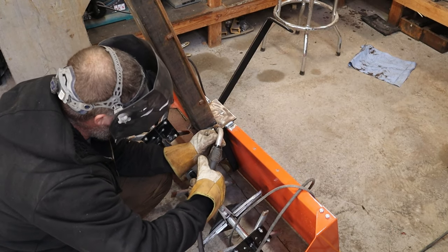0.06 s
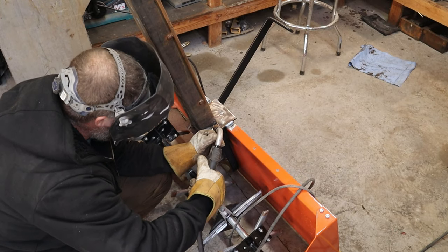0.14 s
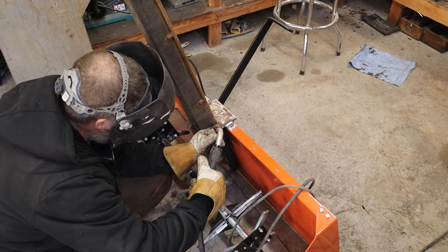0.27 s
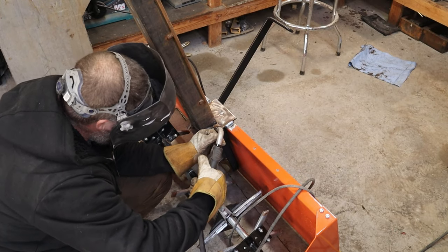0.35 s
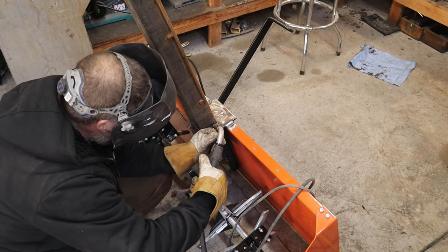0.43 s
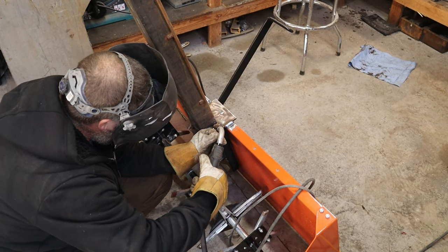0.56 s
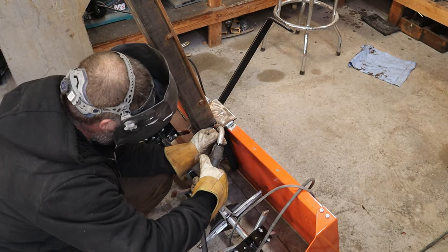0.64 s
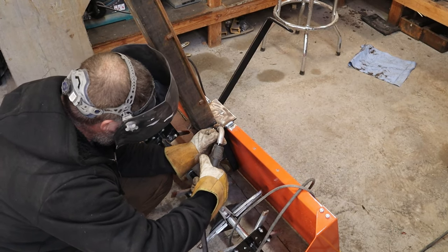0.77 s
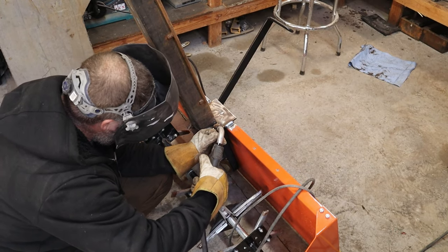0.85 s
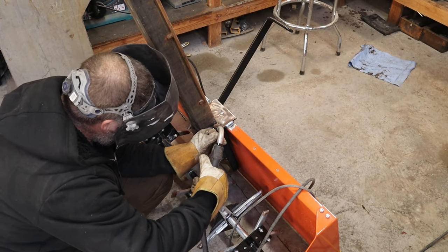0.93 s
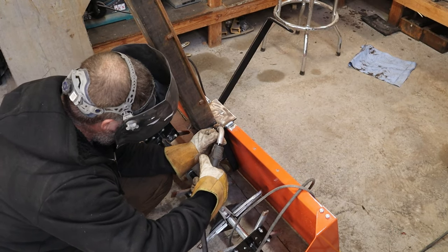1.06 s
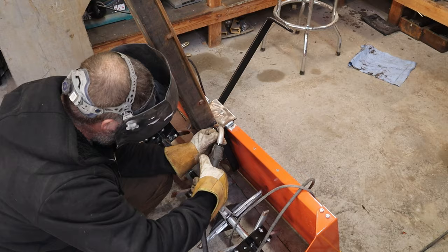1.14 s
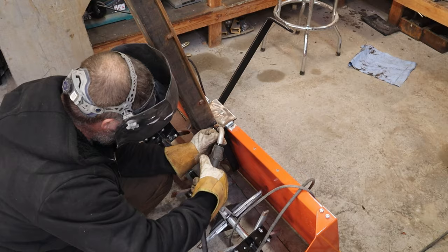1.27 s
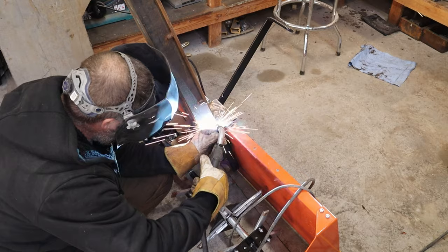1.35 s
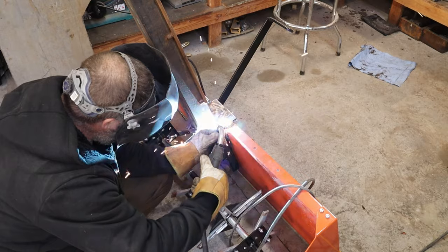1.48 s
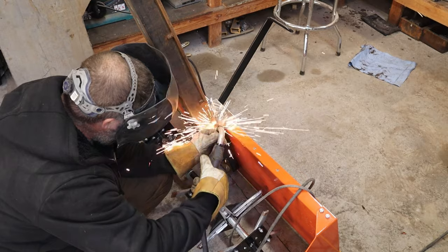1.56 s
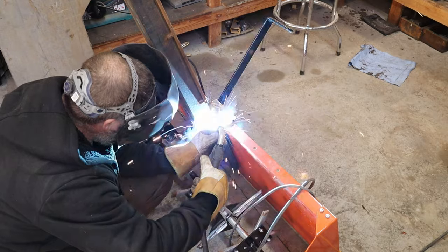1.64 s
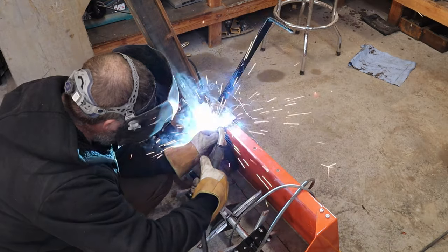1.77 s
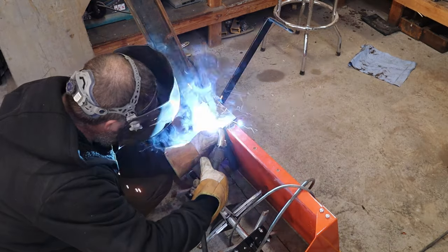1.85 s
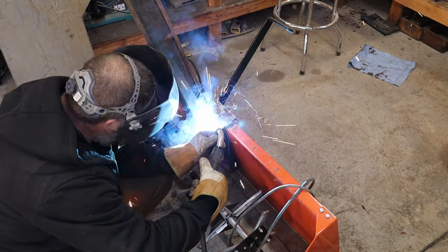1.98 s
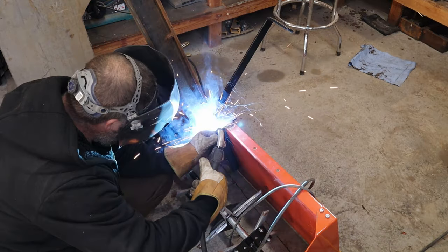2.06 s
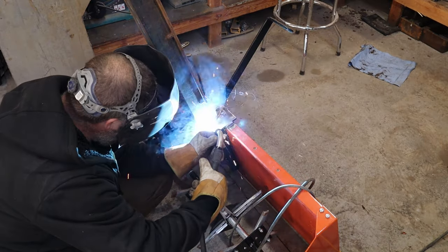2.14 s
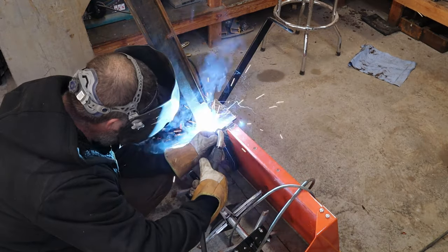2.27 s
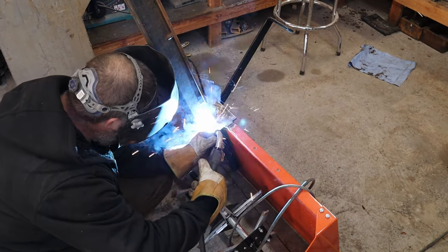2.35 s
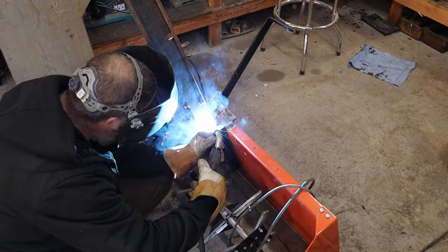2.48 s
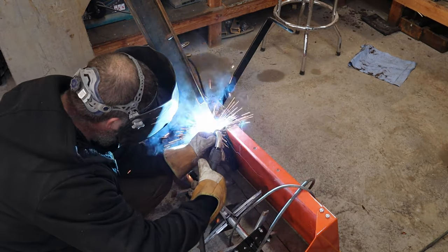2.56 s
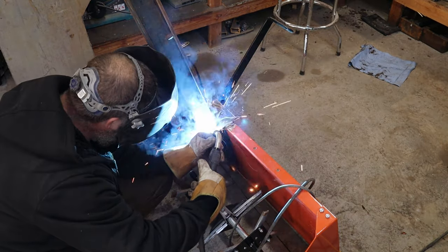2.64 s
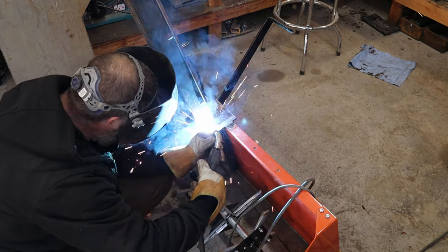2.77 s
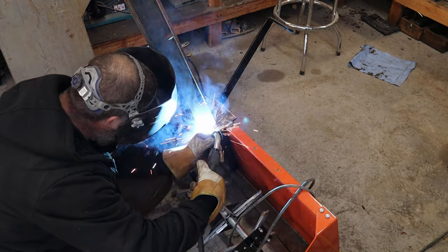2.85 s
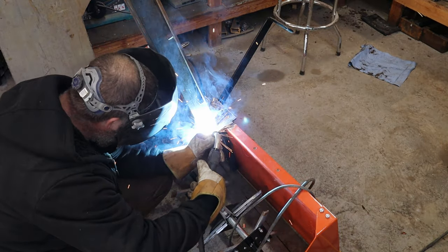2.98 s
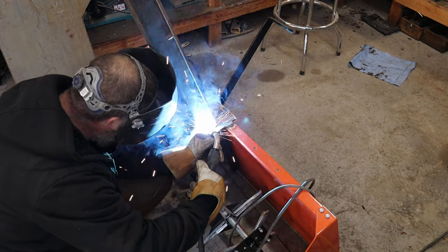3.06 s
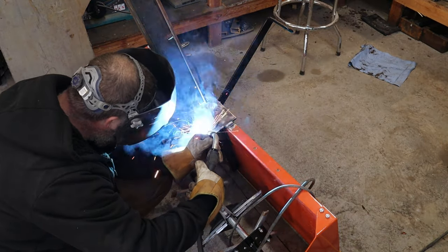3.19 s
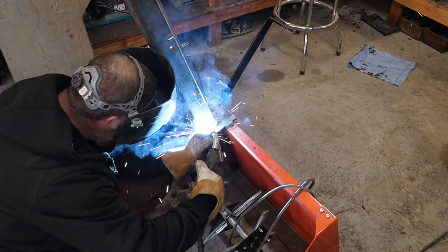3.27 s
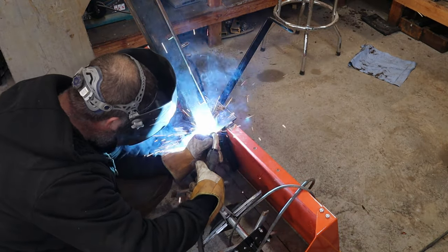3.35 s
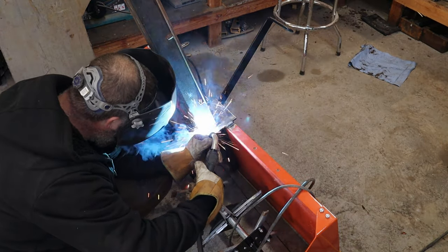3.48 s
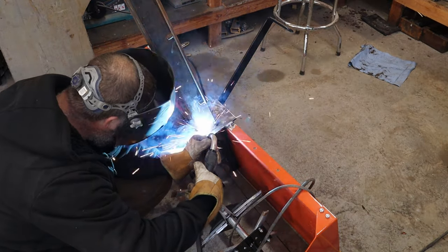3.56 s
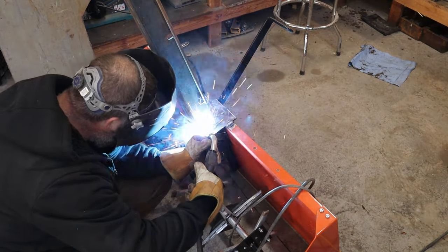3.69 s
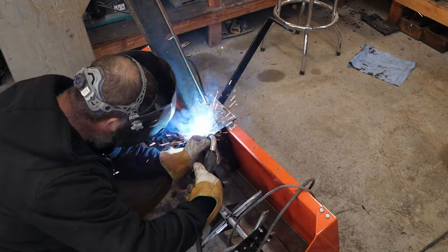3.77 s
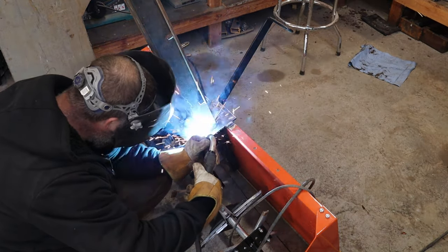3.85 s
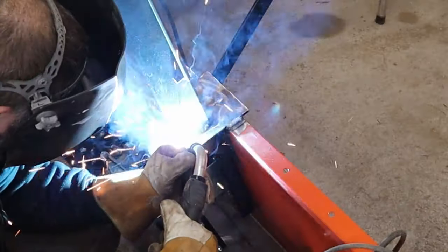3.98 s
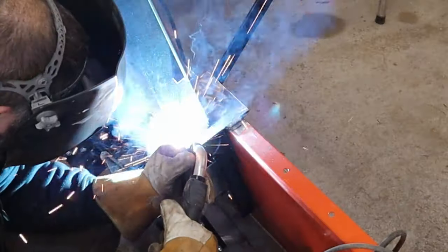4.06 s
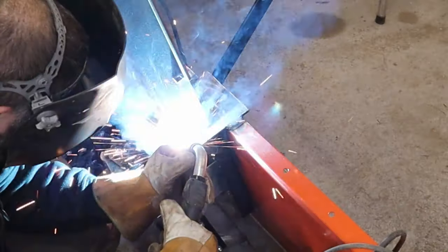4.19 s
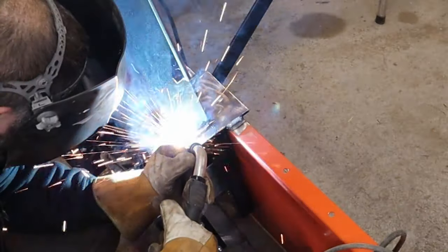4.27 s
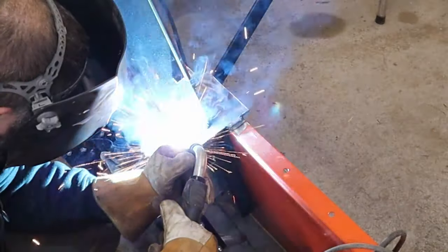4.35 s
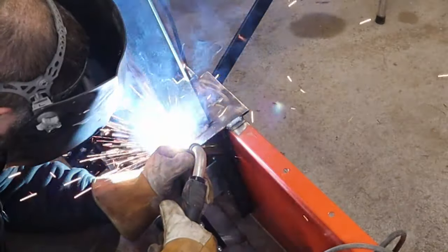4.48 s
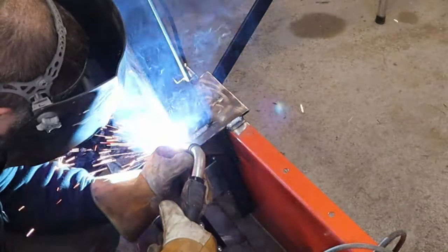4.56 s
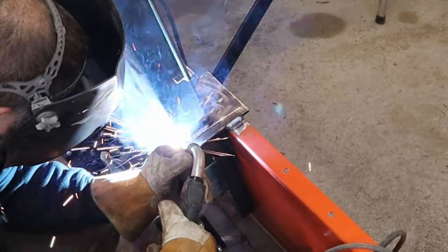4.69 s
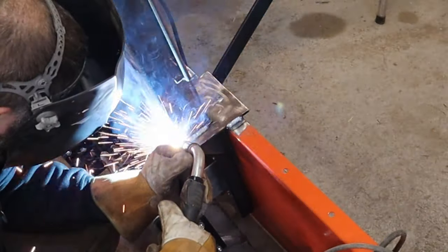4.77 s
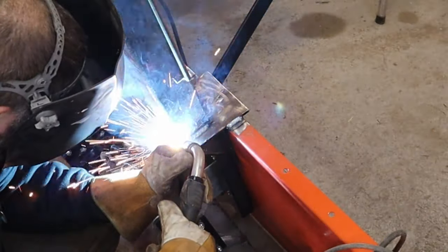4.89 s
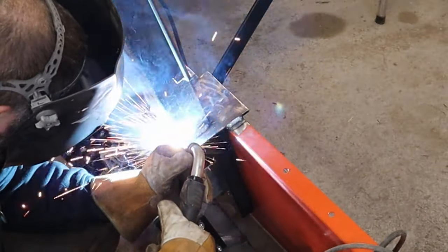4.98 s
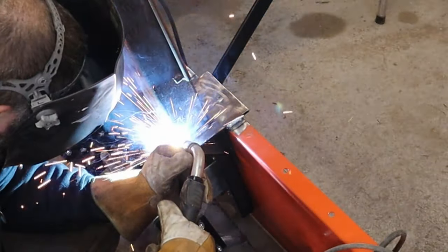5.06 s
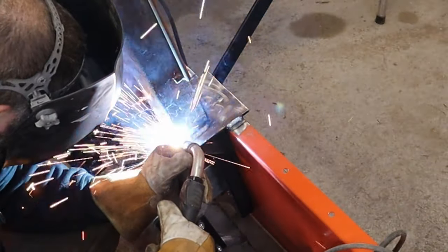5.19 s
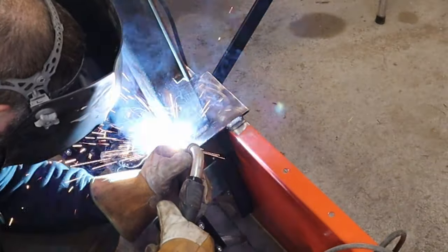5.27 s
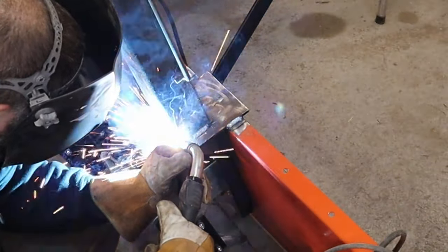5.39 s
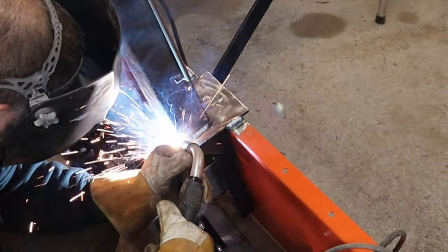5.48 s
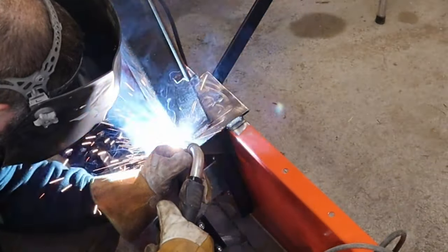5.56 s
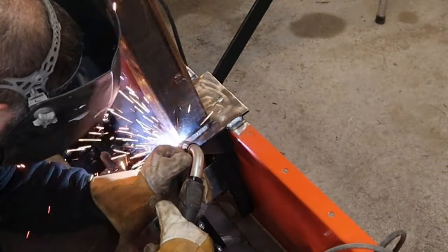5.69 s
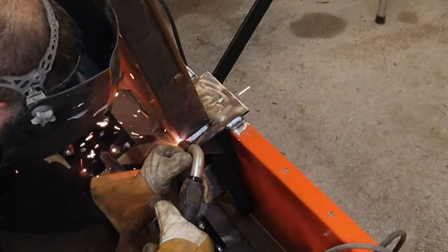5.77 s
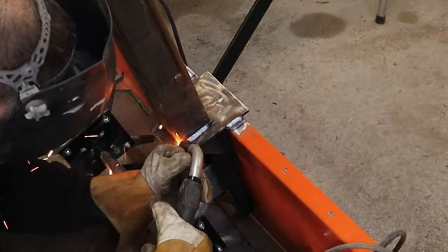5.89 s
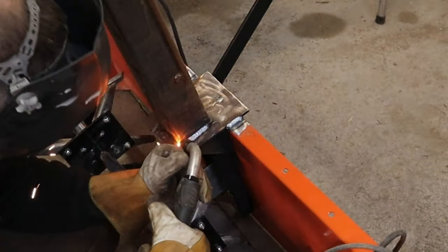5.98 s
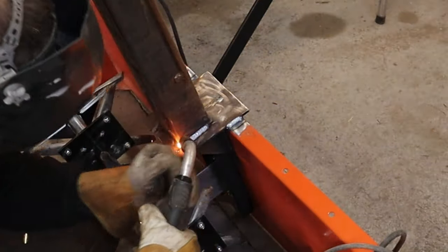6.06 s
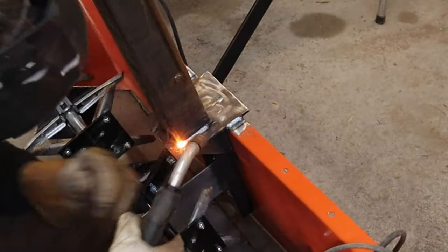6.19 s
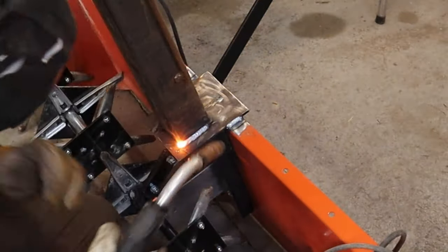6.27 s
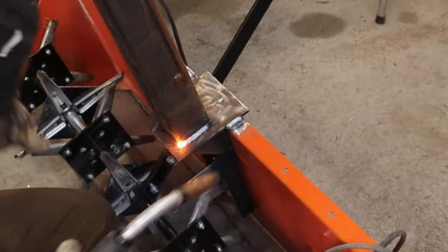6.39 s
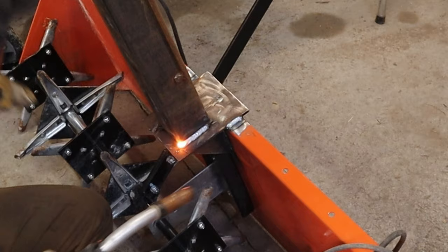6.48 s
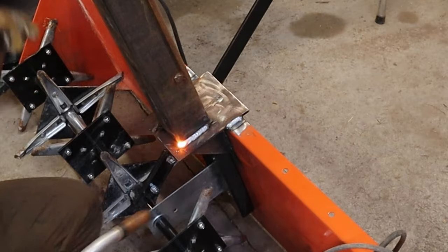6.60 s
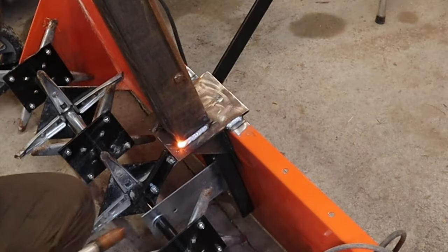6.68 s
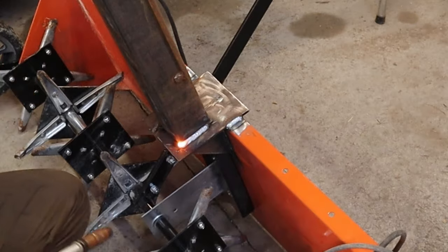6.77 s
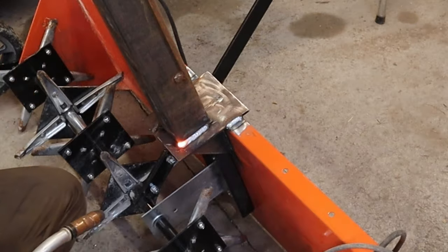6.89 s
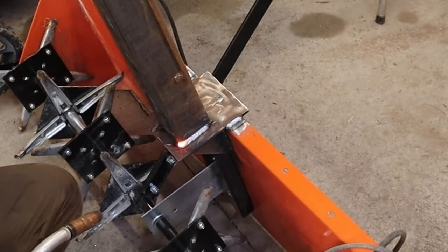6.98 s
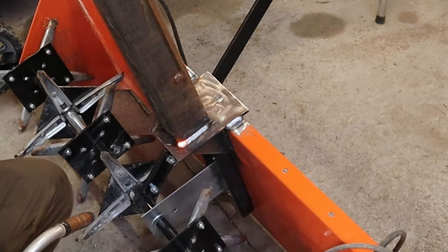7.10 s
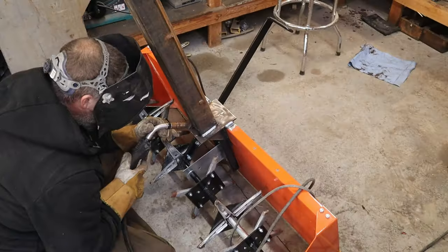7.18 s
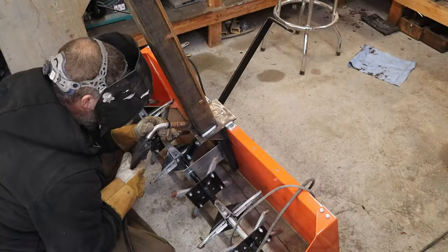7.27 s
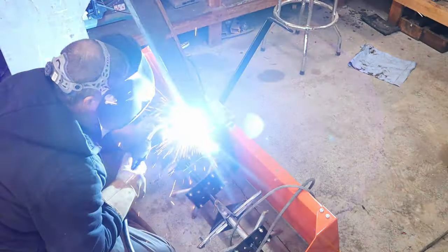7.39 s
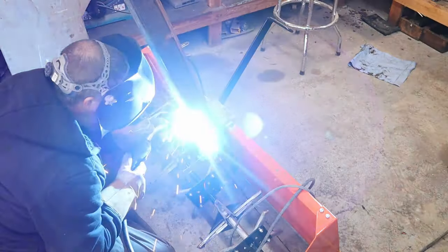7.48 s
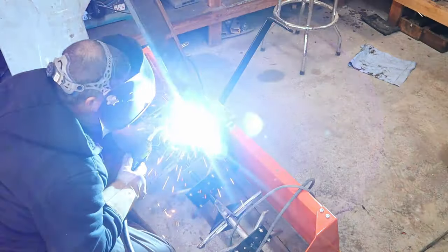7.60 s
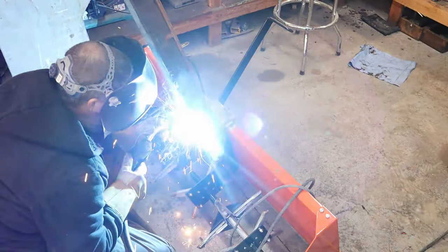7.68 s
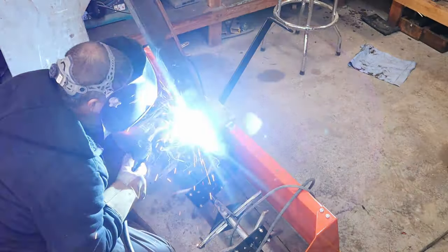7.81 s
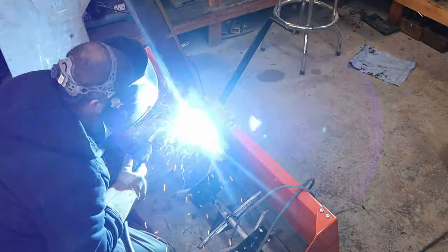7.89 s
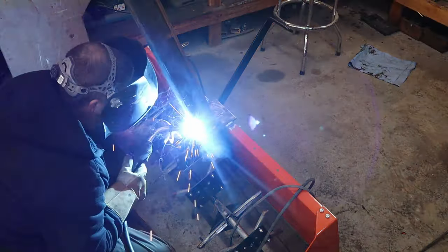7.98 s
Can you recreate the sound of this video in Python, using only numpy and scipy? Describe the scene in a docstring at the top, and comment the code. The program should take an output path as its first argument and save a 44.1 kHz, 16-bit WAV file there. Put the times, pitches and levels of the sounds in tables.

```python
"""Wire-feed welding in a workshop

A wire-feed welder lays a bead on a steel frame. The gas valve clacks and gas hisses: noise through nozzle modes.
The arc stutters alight, blurs into a wide swirling hiss, then crackles close and sharp: unevenly timed pops.
The gas runs on, cloth rubs and something knocks with short modes; then a second run starts.
Echoes and a diffuse tail place arc and knocks in the shop, over a low drone and faint hiss."""
import sys
import numpy as np
from scipy import signal
from scipy.fft import rfft, irfft, next_fast_len
from scipy.io import wavfile
from scipy.ndimage import uniform_filter1d, map_coordinates

SR = 44100
rng = np.random.default_rng(int(sys.argv[2]) if len(sys.argv) > 2 else 0)


def pcm_store(signal):
    """Save signal as 16-bit PCM."""
    levels = np.round(np.clip(np.atleast_2d(signal), -1, 1) * 32767)
    wavfile.write(sys.argv[1], SR, levels.astype(np.int16).T)


N = 354563

# loud pops as the stuck wire blows free: t/s, relative level/dB, time stuck beforehand/s
LOUD_POPS = [(1.4075, -10, .01), (1.4228, -5.5, .01), (1.4393, -2, .004), (1.4434, -12, 0.0018),
             (1.4853, -14, 0.0055), (1.5886, -7, 0.007), (1.5929, -8, .003), (1.606, -8.5, .003),
             (1.6259, -7, 0.016), (1.6298, -6, 0.0039), (4.0238, -10.5, .014), (4.114, -9.5, 0.031),
             (4.2586, -12.5, 0.026), (4.301, -9.5, 0.013), (4.3245, -12, .01), (4.4133, -12, 0.016),
             (4.556, -13.5, 0.0072), (4.638, -5, 0.018), (4.6684, -12, .01), (4.6993, -5, 0.013),
             (4.706, -16, .004), (4.812, -11, 0.011), (4.8789, -7, 0.0083), (5.01, -9.5, 0.009),
             (5.125, -13.5, 0.0061), (5.378, -13, 0.0075), (5.5005, -13.5, 0.026), (5.624, -9.5, .01),
             (5.7749, -13.5, .01), (5.8027, -17.5, .01), (5.8615, -16.5, .01), (5.8828, -16.5, .01),
             (5.8987, -15, .01), (7.3834, -12.5, 0.0063), (7.4113, -9, 0.0066), (7.427, -11, 0.0045),
             (7.4448, -7, 0.0072), (7.4615, -8.5, 0.0036), (7.576, -14, 0.018), (7.5924, -12.5, 0.0082),
             (7.6868, -12, 0.0057), (7.7923, -6.5, 0.0087), (7.9812, -19, 0.016)]
# stretches in which the arc burns and crackles: start/s, end/s, level at the start/dB
BURNS = [(1.426, 1.501, -21.5), (1.59, 1.63, -20), (3.967, 4.612, -26.5), (4.66, 5.756, -30.5),
         (7.368, 7.535, -25), (7.574, 8.1, -30.5)]
# colour of the arc's pops and crackle: f/Hz, relative level/dB
POP_COLOUR = [(50, -38), (130, -17), (290, -24), (450, -15.5), (680, -17.5), (930, -6), (1350, -4.5),
              (1600, -12.5), (3050, -3.5), (3450, 2.5), (4300, 2), (4750, -8), (5200, -5.5), (7500, -9.5),
              (10500, -20), (12500, -17.5), (16000, -19)]
# change of colour where the torch faces the listener: f/Hz, gain/dB
FACING_COLOUR = [(150, 2.5), (300, 4), (550, 2.5), (1300, -3), (2000, 2.5), (4200, -0.5), (6000, 1.5),
                 (9000, 4), (15000, 1.5)]
# low flutter under the arc: f/Hz, width/Hz, relative level/dB
FLUTTER_MODES = [(111, 13, -5), (150, 32, -12.5)]
# each burn catches quickly, swells gently and dies quickly
CATCH_S, SWELL_DB_PER_S, QUENCH_S = 0.0019, 2.6, 0.005
# the hot pool sputters on after the arc: level against the burn, and cooling time
POOL_DB, COOLING_S = -14, 0.14
STUCK_DB = -7.5  # the crackle sinks while the wire is stuck

# the crackle blurred into a hiss: t/s, hiss level/dB, body level/dB
BLUR_LEVELS = [(1.673, -27.5, -38.5), (2.0, -26.5, -38), (2.3, -30, -45.5), (2.8, -28.5, -43),
               (3.2, -32.5, -47), (3.65, -31, -41), (3.96, -29.5, -38.5)]
# colour of the blurred hiss: f/Hz, relative level/dB
BLUR_HISS_COLOUR = [(900, -37), (1550, -25), (1780, -1.5), (2050, -8), (2600, -1.5), (3100, 0.5), (4000, 6),
                    (4700, -4), (5200, 1.5), (6600, -6), (8500, -7), (10500, -17), (12500, -11),
                    (15500, -14.5)]
# colour of its lower body: f/Hz, relative level/dB
BLUR_BODY_COLOUR = [(40, -44), (110, -11), (240, -17), (430, -6.5), (650, -11.5), (800, 0), (1100, -2),
                    (1400, 3), (1600, -15), (2400, -69)]
# lulls in which the hiss thins and loses its body: middle/s, length/s, depth of the body/dB
LULLS = [(1.882, 0.13, 9), (2.053, .11, 9.5), (2.236, .1, 7.5), (2.535, 0.059, 5), (2.736, 0.054, 5.5),
         (2.908, .08, 9), (3.076, .1, 6), (3.193, 0.023, 13), (3.51, .07, 5)]
LULL_SHARE = 0.52  # part of that depth by which the hiss sinks
BLUR_FADE_S = 0.013

# shielding gas: valve opens/s, valve shuts/s, surge from the pressure stored in the hose/dB
GAS_FLOWS = [(0.861, 6.48, 16.5), (7.289, 7.3, 21.5)]
# the nozzle rings like a short pipe: f/Hz, nominal width/Hz, relative level/dB
NOZZLE_MODES = [(1365, 180, 2.5), (1800, 73, -4.5), (2460, 530, -13), (3170, 250, -15), (4020, 320, -3.5),
                (4400, 130, 2), (5100, 720, -11.5)]
# hiss of the jet leaving the nozzle: f/Hz, nominal width/Hz, relative level/dB
JET_BANDS = [(7700, 1300, -1.5), (11100, 1600, -10), (13600, 2700, -5)]
PIPE_DB, JET_DB = -61, -66.5  # steady flow: nozzle ring and jet hiss
SURGE_S, PIPE_RISE_S, JET_RISE_S, GAS_RELEASE_S = 2.8, 0.061, 0.082, 0.087
# the torch is lifted off the work: middle and length of the move, share of pitch rise, gain of the uncovered jet
LIFT_S, LIFT_LENGTH_S, LIFT_PITCH, LIFT_JET_DB = 6.3, 0.55, 0.027, 5.5
# colour of the valve's clack: f/Hz, gain/dB
CLACK_COLOUR = [(100, -14), (400, -1), (800, 1.0), (1500, 9.0), (2200, 2.5),
                (4200, 4.5), (6500, -6.0), (10000, -10), (16000, -12)]

# knocks and ticks as the welder shifts: t/s, relative level/dB, relative sharpness/dB
KNOCKS = [(6.425, -43, 8), (6.546, -41, 4), (6.716, -39, -15), (6.795, -45, -8), (6.892, -53, 16),
          (6.9673, -19, 0.5), (7.123, -34, -8)]
# what they ring with: f/Hz, mean relative level/dB, t60/s
KNOCK_MODES = [(233, -7, 0.057), (414, -22, 0.044), (503, -4, 0.07), (584, 5.5, 0.029), (730, -3, 0.034),
               (830, 1, 0.025), (1022, 2.5, 0.045), (1130, -24, 0.032), (2050, -11, 0.028),
               (2900, -22, .03)]
# rubs of the work clothes: middle/s, length/s, level/dB
CLOTH_RUBS = [(6.47, 0.33, -60.5), (6.755, 0.49, -59.5), (6.925, 0.19, -65.5), (7.06, 0.27, -57),
              (7.138, 0.16, -56.5), (7.197, 0.077, -53.5)]
# colour of the rubbing cloth: f/Hz, relative level/dB
CLOTH_COLOUR = [(30, -4), (130, -8.5), (300, -9), (500, -0.5), (700, -8.5), (1100, -7.5), (1900, -11),
                (4800, -14.5), (7000, -23), (15000, -32)]
# soft low thuds: t/s, f/Hz, level/dB, length/s
THUDS = [(6.721, 106, -49, 0.2), (6.795, 68, -53, 0.24)]

# room tone, its hiss thinner under the blurred arc: t/s, hiss level/dB, low drone level/dB
ROOM_LEVELS = [(0, -59, -69), (1.4, -60, -67.5), (2, -73.5, -71), (3.8, -83, -88), (4.1, -57, -87),
               (6.2, -63.5, -77), (8.04, -69, -70)]
# colour of the room's hiss: f/Hz, relative level/dB
ROOM_COLOUR = [(22, -22.5), (70, -2.5), (150, -8), (300, -10.5), (500, -12), (700, -14.5), (1270, -15),
               (1800, -19), (4000, -23), (8000, -26), (16000, -29.5)]
# width of the room's hiss: f/Hz, side level/dB
ROOM_WIDTH = [(60, -32.5), (300, -19), (1200, -13.5), (4000, -22.5), (14000, -29.5)]
# width of the other noise beds: f/Hz, side level/dB
QUIET_WIDTH = [(60, -33.5), (300, -14), (1500, -13), (4000, -23.5), (7000, -14), (12000, -3)]

# echoes from the steel, helmet and floor: delay/ms, relative strength (gain)
ECHOES = [(2.33, 0.31), (5.3, 0.22), (5.9, 0.067), (13.5, 0.091), (21, 0.15)]
# how long the workshop rings: f/Hz, t60/s
SHOP_DECAY = [(150, 0.64), (1000, 0.2), (4000, 0.35), (8000, 0.4), (15000, 0.48)]
# colour of its tail: f/Hz, relative level/dB
SHOP_COLOUR = [(100, -10), (500, 8), (1300, 1.5), (2200, 3), (3500, -9.5), (4300, -1.5), (7000, 6),
               (14000, 0.5)]
# width of its tail: f/Hz, side level/dB
SHOP_WIDTH = [(100, -35), (1000, -6.5), (4000, -24.5), (8000, -3), (14000, 5.5)]
# the two microphone ports differ in the treble: f/Hz, left minus right/dB
PORT_DIFFERENCE = [(4500, 0), (8000, 1), (10000, 3), (12500, -4), (16000, 1)]
TOP_HZ = 15950


def arc():
    """Crackle and loud pops over a low flutter, brighter where the torch faces the listener."""
    pops, stuck = np.zeros(N), np.zeros(N)
    for s, db, stuck_s in LOUD_POPS:
        add(pops, s, np.array([amp(db + 8.5)]))
        # the crackle sinks while the wire sticks in the pool
        add(stuck, s - stuck_s, np.ones(round(abs(stuck_s) * SR)))
    strength = burning()
    # small droplets part softly, larger ones snap, and the arc fries between them
    soft = filtered(short_circuits(rate=150, scatter_db=2.0), lambda hz: 1 / (1 + (hz / 6000) ** 4))
    sharp = short_circuits(rate=140, scatter_db=3.0)
    frying = filtered(rng.standard_normal(N), lambda hz: hz / (hz + 5000))
    mix = amp(-6) * soft + amp(-5.0) * sharp + amp(-6.5) * frying
    crackle = strength * mix * amp(STUCK_DB * np.minimum(stuck, 1))
    # offset the colour's overall gain so that its rms is 1
    colour_gain = np.sqrt(np.mean(amp(along(POP_COLOUR, np.linspace(0, SR / 2, num=512))) ** 2))
    spitting = sizzle(pops, share=0.045, life=0.0055)
    sound = coloured(crackle + spitting, POP_COLOUR) / colour_gain
    bright = coloured(sound, FACING_COLOUR)
    facing = np.interp(np.arange(N) / SR, [2, 3, 6, 7], [1, 0, 0, 1])
    flutter_level = amp(-31.5) * np.minimum(strength, amp(-34.5))
    flutter = flutter_level * unit(filtered(stereo_noise(N), resonances(FLUTTER_MODES)))
    return workshop(sound + facing * (bright - sound), wet_db=-1.5, echo_db=-2.5) + flutter


def burning():
    """Strength of the crackle: each burn catches, swells gently and goes out, leaving the pool to cool."""
    strength = np.zeros(N)
    for start, end, db in BURNS:
        flame = gate(start, end, CATCH_S, QUENCH_S)
        pool = amp(POOL_DB) * gate(start, end, CATCH_S, COOLING_S)
        strength += amp(db + SWELL_DB_PER_S * since(start)) * np.maximum(flame, pool)
    return strength


def short_circuits(rate, scatter_db):
    """The wire dips and burns free at uneven intervals (rate per s); a longer wait gives a bigger pop."""
    waits = rng.gamma(3, 1 / 3, size=4000)
    sizes = np.sqrt(waits) * amp(scatter_db * rng.standard_normal(len(waits)).clip(-2, 1.3))
    at = (np.cumsum(waits) / rate * SR).astype(int)
    pops = np.bincount(at[at < N], sizes[at < N], N)
    train = sizzle(pops, share=0.06, life=0.0036)
    # the steady wire feed keeps the power even over many pops
    return train / np.sqrt(np.abs(uniform_filter1d(train ** 2, size=3500)) + 1e-9)


def sizzle(pops, share, life):
    """Each pop is followed by a short spit of noise as the arc flares, decaying over life seconds."""
    flare = np.abs(pops) * amp(5.5 * rng.standard_normal(N).clip(-2, 2))
    flare = signal.lfilter([1], [1, -np.exp(-1 / (life * SR))], flare)
    return pops + share * flare * rng.standard_normal(N)


def blurred_arc():
    """The crackle smears into a wide hiss; hollows swirl through it and its body comes and goes."""
    pop_power = uniform_filter1d(short_circuits(rate=180, scatter_db=2.0) ** 2, size=300)
    flutter = np.sqrt(np.abs(pop_power) + 1.5)
    steady = unit(workshop(rng.standard_normal(N), wet_db=-5, echo_db=-5))[0] * flutter
    z = signal.stft(steady, nperseg=2048)[2]
    # the two channels drift in and out of phase, differently at each pitch
    knots = np.indices(z.shape) / np.array([16, 8])[:, None, None]
    drift = 1.8 * map_coordinates(rng.standard_normal(z.shape), knots)
    turned = z * np.exp(1j * np.array([drift, -drift]))
    swirl = signal.istft(turned, nperseg=2048)[1][:, :N]
    wide = flutter * rng.standard_normal((2, N))
    s, hiss_db, body_db = np.transpose(BLUR_LEVELS)
    t = since(0)
    lull_db = sum(depth_db * swell(middle, length) for middle, length, depth_db in LULLS)
    lull_db = lull_db + 1.5 * wobble(rate=28)
    hiss = unit(coloured(swirl + amp(-12.5) * wide, BLUR_HISS_COLOUR))
    hiss = amp(np.interp(t, s, hiss_db) - LULL_SHARE * lull_db) * hiss
    body = unit(coloured(flutter * wide, BLUR_BODY_COLOUR))
    body = amp(np.interp(t, s, body_db) - lull_db) * body
    return gate(s[0], s[-1], CATCH_S, BLUR_FADE_S) * (hiss + body)


def gas():
    """Gas surges through the nozzle and settles; it rings higher and hisses more as the torch lifts."""
    lift = swell(LIFT_S, LIFT_LENGTH_S)
    # reading the noise faster raises its pitch
    clock = np.cumsum(1 + LIFT_PITCH * lift + (0.006 + 0.028 * lift) * wobble(rate=18))

    def rush(modes, rise):
        """Resonant noise that follows the valve and the hose pressure."""
        flow = np.zeros(N)
        for opens, shuts, surge_db in GAS_FLOWS:
            surge = amp(surge_db * np.exp(-since(opens) / SURGE_S))
            flow += gate(opens, shuts, rise, GAS_RELEASE_S) * surge
        noise = unit(filtered(stereo_noise(N), resonances(modes)))
        return flow * np.array([map_coordinates(channel, [clock], mode="wrap") for channel in noise])

    pipe = amp(PIPE_DB) * rush(NOZZLE_MODES, PIPE_RISE_S)
    jet = amp(JET_DB + LIFT_JET_DB * lift) * rush(JET_BANDS, JET_RISE_S)
    return pipe + jet


def trigger():
    """The trigger pings faintly as a decaying sine, then the gas valve clacks open as a burst of noise."""
    t, track = np.arange(SR // 4) / SR, np.zeros(N)
    ping = amp(-50.0 - 60 * t / 0.097) * np.sin(2 * np.pi * 3200 * t) * (1 - np.exp(-t / 0.0016))
    add(track, 0.797, ping)
    s = 0.851
    snap = amp(-29.5) * gate(s, s, attack=0.001, release=0.0086)
    after = amp(-40) * gate(s, s, attack=0.004, release=0.048)
    return track + coloured(stereo_noise(N) * (snap + after), CLACK_COLOUR)


def knocks():
    """Dull contacts: a few short modes under a small crack of noise."""
    t, track = np.arange(SR // 4) / SR, np.zeros(N)
    for s, db, sharp_db in KNOCKS:
        ring = np.zeros(len(t))
        for hz, mode_db, t60 in KNOCK_MODES:
            # each contact excites the modes a little differently
            ring += amp(mode_db + rng.normal(0, 1.3) - 60 * t / t60) * np.sin(2 * np.pi * hz * t)
        crack = amp(sharp_db + 9.5 - 60 * t / 0.022) * rng.standard_normal(len(t))
        crack = filtered(crack, lambda hz: 1 / (1 + (hz / 4500) ** 4))
        add(track, s, amp(db - 13.0) * (ring + crack))
    # a small body radiates little bass
    thin = filtered(track, lambda hz: hz ** 2 / (hz ** 2 + 300 ** 2))
    return workshop(thin, wet_db=-2, echo_db=-8)


def shifting():
    """Heavy cloth rubs in small catches of noise, with soft sine thuds beneath."""
    catch_power = uniform_filter1d(short_circuits(rate=160, scatter_db=-2) ** 2, size=400)
    catches = np.sqrt(np.abs(catch_power) + 0.3)
    rubbing = sum(amp(db) * swell(middle, length) for middle, length, db in CLOTH_RUBS)
    sound = rubbing * unit(coloured(stereo_noise(N) * catches, CLOTH_COLOUR))
    for s, hz, db, length in THUDS:
        u = np.linspace(0, 1, round(length * SR))
        hump = np.sin(np.pi * u ** 0.4) ** 2  # quick rise, slower fall
        add(sound, s, amp(db) * hump * np.sin(2 * np.pi * hz * length * u))
    return sound


def room_tone():
    """The workshop's low drone, noise around 77 Hz, and its faint broad hiss."""
    s, hiss_db, drone_db = np.transpose(ROOM_LEVELS)
    drone = unit(filtered(stereo_noise(N), lambda hz: 1 / (1 + ((hz - 77) / 22) ** 2)))
    hiss = unit(coloured(stereo_noise(N, ROOM_WIDTH), ROOM_COLOUR))
    return level(s, drone_db) * drone + level(s, hiss_db) * hiss


def workshop(x, wet_db, echo_db):
    """Direct sound, echoes from things nearby and a diffuse tail that decays at its own pace in each band."""
    hz, t, z = signal.stft(stereo_noise(SR // 2, SHOP_WIDTH), SR, nperseg=256)
    fade = amp(along(SHOP_COLOUR, hz)[:, None] - 60 * t / along(SHOP_DECAY, hz)[:, None])
    tail = signal.istft(z * fade, SR, nperseg=256)[1]
    # the tail builds up just after the direct sound
    tail *= 1 - np.exp(-(np.arange(tail.shape[1]) / SR / 0.00082) ** 2)
    response = amp(wet_db) * tail / np.linalg.norm(tail[0])
    response[:, 0] += 1
    for k, (ms, strength) in enumerate(ECHOES):
        # the echoes lean to alternate sides
        lean_db = (-1) ** k * 0.31 * np.array([[1], [-1]])
        add(response, ms / 1000, strength * amp(echo_db + lean_db))
    return signal.fftconvolve(x[None], response, axes=1)[:, :N]


def stereo_noise(size, width=QUIET_WIDTH):
    """Two channels of noise with the given share of side signal."""
    mid, side = rng.standard_normal((2, size))
    side = coloured(side, width)
    return np.array([mid + side, mid - side])


def resonances(modes):
    """Gain against frequency of resonant peaks; each halves at 0.72 of its nominal width from the centre."""
    return lambda hz: sum(amp(db) / (1 + ((hz - centre) / (0.72 * width)) ** 2) for centre, width, db in modes)


def coloured(x, points):
    """Filter to a colour given in Hz and dB."""
    return filtered(x, lambda hz: amp(along(points, hz)))


def filtered(x, gain):
    """Causal minimum-phase filter with the given gain against frequency."""
    m = 2 * next_fast_len(x.shape[-1] // 2 + 4096)
    cepstrum = irfft(np.log(np.maximum(gain(np.fft.rfftfreq(m, 1 / SR)), 1e-6)), m)
    # folding the cepstrum forward makes the filter causal
    cepstrum[1:m // 2] *= 2
    cepstrum[m // 2 + 1:] = 0
    return irfft(rfft(x, m) * np.exp(rfft(cepstrum)), m)[..., :x.shape[-1]]


def along(points, hz):
    """Read (Hz, value) points on a log axis."""
    f, v = np.transpose(points)
    return np.interp(np.log(hz + 1), np.log(f), v)


def amp(db):
    """Decibels to gain."""
    return 10 ** (np.asarray(db) / 20)


def unit(x):
    """Scale to rms 1."""
    return x / np.sqrt(np.mean(x ** 2) + 1e-20)


def level(s, db):
    """Gain per sample through points in time and dB."""
    return amp(np.interp(since(0), s, db))


def since(s):
    """Seconds elapsed since a moment, zero before it."""
    return np.maximum(np.arange(N) / SR - s, 0)


def gate(start, end, attack, release):
    """Rise, hold and exponential release."""
    return (1 - np.exp(-since(start) / attack)) * np.exp(-since(end) / release)


def swell(middle, length):
    """One smooth hump of height 1."""
    return np.sin(np.pi * np.minimum(since(middle - length / 2) / length, 1)) ** 2


def wobble(rate):
    """A smooth random curve, rate knots a second."""
    return map_coordinates(rng.standard_normal(1000), [since(0) * rate], mode="wrap")


def add(track, s, sound):
    """Mix a sound into a track at a time."""
    part = track[..., max(round(s * SR), 0):][..., :sound.shape[-1]]
    part += sound[..., :part.shape[-1]]


def scene():
    """Arc, gas and the welder's movements over the room tone."""
    return arc() + blurred_arc() + gas() + trigger() + knocks() + shifting() + room_tone()


def record(dry):
    """The microphone rounds the highest peaks, its ports colour the treble and its band ends steeply."""
    soft = dry / (1 + np.abs(dry / 0.7) ** 4) ** (1 / 4)
    m = next_fast_len(N + SR // 4)
    hz = np.fft.rfftfreq(m, 1 / SR)
    # half of the difference goes to each side
    ports = amp(np.outer([0.5, -0.5], along(PORT_DIFFERENCE, hz)))
    return irfft(rfft(soft, m) * ports / (1 + (hz / TOP_HZ) ** 200), m)[:, :N]


dry = scene()
out = record(dry)
pcm_store(out)
```